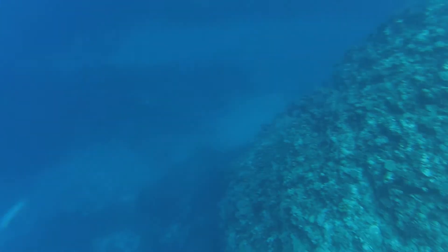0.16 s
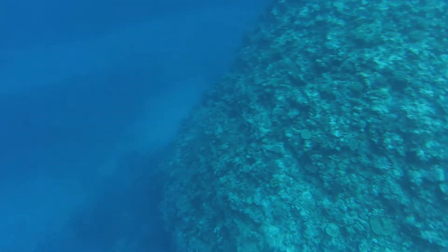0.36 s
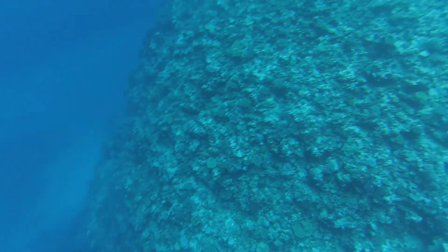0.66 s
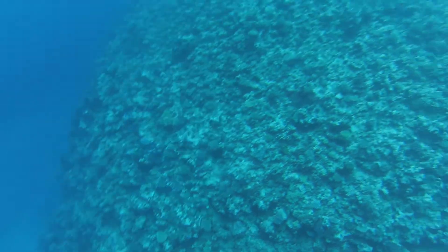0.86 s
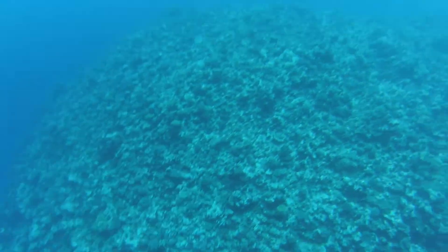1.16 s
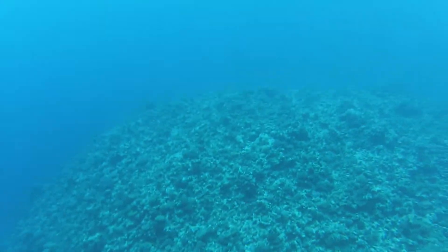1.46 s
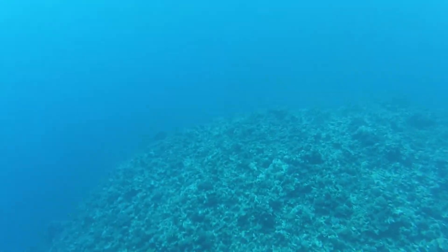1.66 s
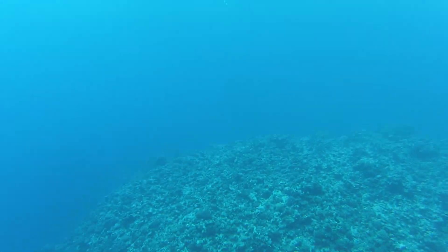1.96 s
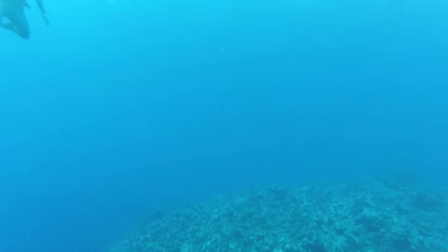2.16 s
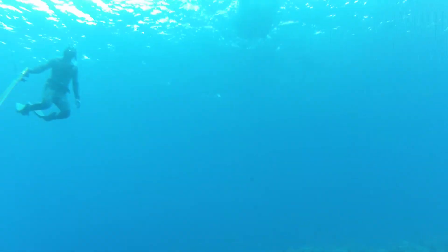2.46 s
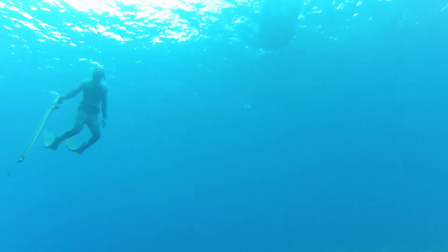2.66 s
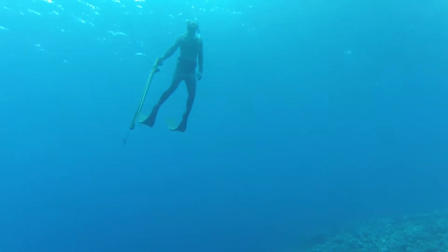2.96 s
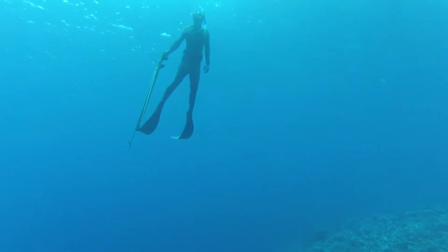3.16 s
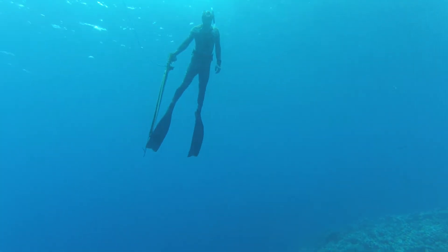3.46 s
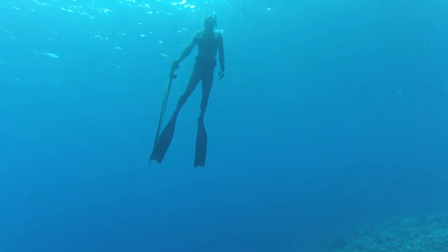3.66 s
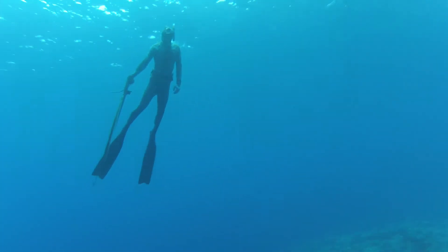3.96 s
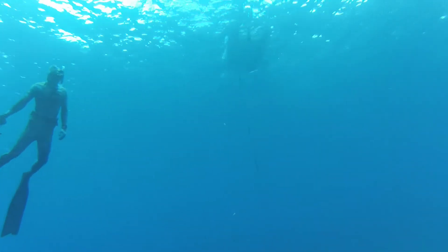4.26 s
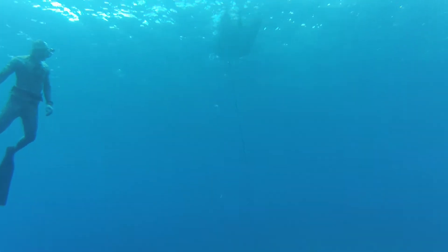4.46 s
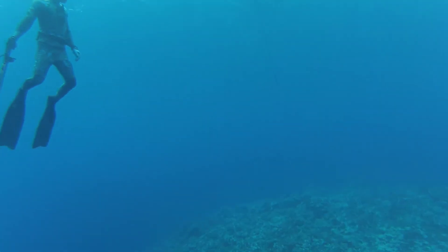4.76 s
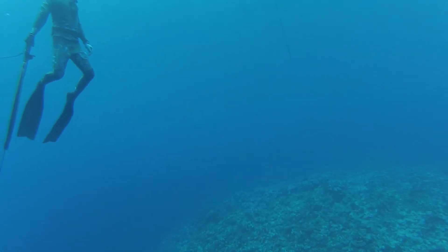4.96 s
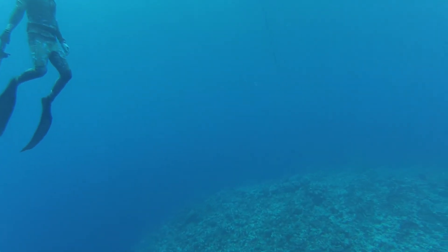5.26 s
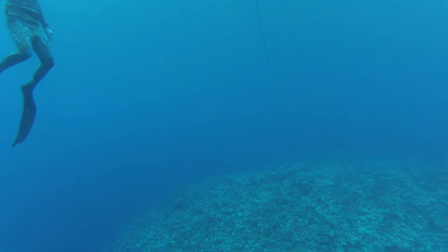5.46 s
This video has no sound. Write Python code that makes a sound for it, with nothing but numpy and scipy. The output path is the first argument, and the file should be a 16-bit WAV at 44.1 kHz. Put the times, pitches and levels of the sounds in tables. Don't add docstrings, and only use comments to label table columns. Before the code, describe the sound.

Bubbles snap against a camera housing turning underwater above a reef. Sparse bright plinks open, a dense gurgling and fizzing burst follows, then an even string of leaking bubbles hums downward amid stuttering creaks. The second half is calmer: deep streaming water, dull thuds, scattered pops, three quick hard knocks and one harder bump. The microphone is inside the case, muffled and resonant, with no open-air echo.

```python
import sys
import numpy as np
from scipy import signal
from scipy.io import wavfile
from scipy.ndimage import uniform_filter1d

SR = 44100
rng = np.random.default_rng(int(sys.argv[2]) if len(sys.argv) > 2 else 0)


def gain_from_db(level_db):
    decades = np.asarray(level_db, float) / 20
    return 10 ** decades


def wav_out(sig):
    wavfile.write(sys.argv[1], SR, np.round(np.clip(np.atleast_2d(sig).T, -1, 1) * 32767).astype(np.int16))


N = 246959
t = np.arange(N) / SR


def evened(x):
    return x / np.sqrt(np.mean(x ** 2) + 1e-20)


def read(points, hz):
    f, value = np.transpose(points)
    return np.interp(np.log(hz + 1), np.log(f + 1), value)


def add(mix, s, sound):
    part = mix[max(round(s * SR), 0):][:len(sound)]
    part += sound[:len(part)]


def ring(hz, cycles, glide=0., rise=0.29):
    u = np.arange(int(cycles * SR / hz) + 8) * hz / SR
    tone = np.sin(2 * np.pi * (u + glide * u ** 2 / cycles))
    return tone * gain_from_db(-60 * u / cycles) * (1 - np.exp(-u / rise)) ** 2


def struck(modes, bright_db=0., chance=np.zeros((2, 5))):
    out = np.zeros(3000)
    for (hz, cycles, db), detune, shift in zip(modes, *chance):
        level_db = db + bright_db * (hz > 2900) + 3.0 * shift
        add(out, 0, gain_from_db(level_db) * ring(hz * (1 + .03 * detune), cycles, rise=hz / 2600))
    return out


def snap(points):
    level_db = read(points, abs(np.fft.fftfreq(4096, 1 / SR)))
    log_gain = np.log(gain_from_db(np.maximum(level_db, -100)))
    pulse = np.fft.ifft(np.exp(np.conj(signal.hilbert(log_gain)))).real[:1024]
    return pulse / abs(pulse).max()


def noise(points, size, patchy_db, flicker_db):
    frames, hz = 4 * N // size + 5, np.fft.rfftfreq(size, 1 / SR)
    a, b, patches = rng.standard_normal((frames, len(hz), 3)).T
    patches = evened(uniform_filter1d(uniform_filter1d(patches, size=6, axis=0), size=6, axis=1))
    flicker = evened(uniform_filter1d(rng.standard_normal(frames), size=3))
    level_db = read(points, hz)[:, None] + patchy_db * patches + flicker_db * flicker
    z = (a + 1j * b) * gain_from_db(level_db)
    return evened(signal.istft(z, nperseg=size, noverlap=size - size // 4)[1][:N])


# (pitch [Hz], rms level [dB])
WHINE_TONES = [(11075, -88), (12557, -90), (13067, -76), (13127, -79)]


def whine():
    tones = [np.sqrt(2) * gain_from_db(db) * np.sin(2 * np.pi * (hz * t + rng.random())) for hz, db in WHINE_TONES]
    return sum(tones)


# (pitch [Hz], level per Hz [dB])
HISS_SPECTRUM = [(150, -71), (250, -48), (554, -7.5), (883, 6), (1230, -35), (1640, -0.5), (1860, -47),
                 (2360, 8), (2910, -23), (3970, -1), (5330, -17.5), (6120, -7), (8800, -17), (10400, -9.5),
                 (12500, -16.5), (15150, -20), (15500, -52)]


def hiss():
    return gain_from_db(-58.5) * noise(HISS_SPECTRUM, size=256, patchy_db=2.8, flicker_db=2.4)


# (time [s], amount [dB], coarseness: large bubbles over small [dB])
SHED_AIR = [(0, -63.5, -15), (.88, -54.5, -1), (.97, -48.5, -17), (1.11, -43.5, -26.5), (1.57, -41.5, -6),
            (1.65, -36, -11), (1.89, -42, -1), (2.56, -41, -5), (2.74, -51, 4), (3.15, -47.5, 1.5),
            (3.4, -55, 11.5), (4.62, -53, 7.5), (5.6, -56.5, 7)]


def flow(amount=1.0, coarse=0.):
    s, amount_db, coarse_db = np.transpose(SHED_AIR)
    return gain_from_db(np.interp(t, s, amount * amount_db + coarse * coarse_db))


# (pitch [Hz], level per Hz [dB])
RUMBLE_SPECTRUM = [(7.1, -5), (12, 21.5), (30, 0), (120, -12), (173, -14), (254, -27.5), (316, -34),
                   (400, -29.5), (520, -45.5), (880, -120)]
# (time [s], level [dB])
STREAMING_WATER = [
    (0.0, -47.5),
    (1.25, -40.5),
    (1.54, -42),
    (2.14, -37.5),
    (2.37, -38),
    (2.71, -36),
    (2.92, -41),
    (4.16, -38.5),
    (4.35, -36.5),
    (5.6, -42),
]


def rumble():
    low = noise(RUMBLE_SPECTRUM, size=2048, patchy_db=-1.3, flicker_db=3.0)
    deep = signal.filtfilt(*signal.butter(2, 48.6, fs=SR), low)
    s, db = np.transpose(STREAMING_WATER)
    sway = gain_from_db(-8.5) * flow(0.047, -.22) * deep
    drone = gain_from_db(np.interp(t, s, db) + 41.5) * (low - deep)
    return gain_from_db(-31) * (sway + drone)


# (time [s], level [dB], ring pitch [Hz], bare click level [dB])
TICK_TIMES = [(0.176, -50, 10000, -48), (0.3031, -40, 10900, -44), (0.5105, -51, 11300, -46),
              (0.564, -30, 11400, -41), (0.9267, -49, 9390, -49), (0.9706, -39, 11600, -44),
              (0.9945, -37, 12600, -46), (1.0539, -38, 12400, -46), (1.0918, -42, 9300, -46),
              (1.1133, -34, 11400, -46), (1.1704, -42, 10500, -46), (1.222, -44, 12400, -46),
              (1.3636, -32, 11800, -48), (1.4036, -46, 10200, -52), (1.452, -45, 12000, -46),
              (1.4979, -37, 12600, -48), (1.6225, -41, 10500, -41), (1.733, -50, 11200, -44),
              (1.7458, -47, 11100, -46), (1.768, -32, 11800, -46), (1.928, -41, 10400, -49),
              (2.0606, -43, 12000, -46), (2.1675, -50, 9950, -46), (2.327, -41, 10400, -46),
              (2.6125, -54, 11300, -44), (2.7556, -50, 10000, -46), (2.841, -47, 10500, -46),
              (3.19, -44, 10100, -46), (3.2972, -49, 10200, -46), (3.6141, -40, 11900, -46),
              (3.7682, -51, 10500, -42), (3.8486, -45, 12000, -46), (4.6694, -60, 11000, -41),
              (4.9949, -44, 9650, -44), (5.0667, -50, 10100, -43), (5.1172, -50, 9750, -38),
              (5.1235, -42, 10400, -37), (5.2938, -50, 10300, -45)]


def ticks():
    out = np.zeros(N)
    for s, db, hz, click_db in TICK_TIMES:
        add(out, s, gain_from_db(db + 1.5) * ring(hz, 60.0, rise=0.32))
        add(out, s, gain_from_db(click_db + 14.0) * ring(9100, 3.5))
    return out


# (time [s], level [dB], ring pitch [Hz], thud level [dB])
SOFT_KNOCKS = [(1.095, -34, 770, -33), (1.193, -32, 630, -62), (1.787, -38.5, 786, -35),
               (2.045, -39, 910, -41), (2.166, -37, 710, -40), (2.218, -41.5, 457, -33),
               (4.206, -43, 677, -53), (3.115, -45, 720, -59), (3.17, -35.5, 720, -47),
               (3.282, -36.5, 640, -45), (3.402, -41, 705, -46), (3.429, -36.5, 620, -44),
               (3.508, -34.5, 670, -45), (3.646, -41, 645, -36), (3.832, -37.5, 660, -45),
               (3.924, -38, 670, -53), (4.134, -38, 620, -34.5), (4.514, -41, 664, -33),
               (4.163, -40.5, 695, -31), (4.774, -37.5, 606, -48), (4.85, -40, 685, -40),
               (4.991, -29.5, 647, -41), (5.494, -42.5, 696, -51), (4.098, -39, 680, -37)]
# (time [s], level [dB])
HARD_BUMPS = [
    (4.6393, -22),
    (4.669, -20),
    (4.696, -20.5),
    (4.9679, -16),
]
# (pitch [Hz], fade [cycles], level [dB])
BUMPED_CASE = [
    (1286, 6.3, 13.5),
    (2100, 8, -25),
    (760, 10.1, 6.5),
    (177.4, 10.4, 0),
]


def knocks():
    out = np.zeros(N)
    for s, db, hz, thud_db in SOFT_KNOCKS:
        add(out, s, gain_from_db(db + 9.5) * ring(hz, 23.0))
        add(out, s, gain_from_db(db + 5.5) * ring(439, 13.5))
        add(out, s, -gain_from_db(thud_db + 9.0) * ring(173, 8.8))
    for s, db in HARD_BUMPS:
        add(out, s, -gain_from_db(db) * struck(BUMPED_CASE))
    return out


# (start [s], end [s], slip rate [1/s], level [dB], brightness [dB])
MOUNT_CREAKS = [(1.726, 1.765, 230, -25.5, -11.5), (2.375, 2.414, 173, -34, -1),
                (2.44, 2.485, 152, -25, -11), (2.541, 2.581, 123, -24.5, -6),
                (2.59, 2.627, 190, -28.5, -10), (2.676, 2.73, 119, -28, 2.5),
                (2.877, 2.978, 141, -31.5, 1.5), (3.003, 3.035, 107, -29, 1.5),
                (3.171, 3.189, 163, -26, -11), (3.205, 3.242, 152, -23.5, -0.5),
                (3.285, 3.307, 123, -30, -9), (3.426, 3.454, 170, -27, -12.5),
                (3.501, 3.52, 320, -32, -4.5), (3.6, 3.623, 173, -26, -15), (4.774, 4.802, 96, -31.5, -6.5),
                (4.733, 4.747, 62, -37, 5.5), (4.831, 4.845, 110, -44.5, 10)]
# (pitch [Hz], fade [cycles], level [dB])
SLIPPING_MOUNT = [
    (4150, 30, 3),
    (3500, 32, 1),
    (2350, 20, -8),
    (1700, 18, 0),
    (780, 10, -3),
]


def creaks():
    out = np.zeros(N)
    chances = rng.standard_normal((len(MOUNT_CREAKS), 24, 3, 5))
    for (start, end, per_s, db, bright_db), chance in zip(MOUNT_CREAKS, chances):
        uneven = max(0.00319 * (per_s - 125), .07)
        gaps = np.maximum(1 + uneven * chance[:, 2, 0], .3) / per_s
        times = start + np.cumsum(gaps) - gaps[0]
        vary = min(3 * uneven + .5, 1)
        for s, slip in zip(times[times < end], chance):
            add(out, s, gain_from_db(db + 2.5 * slip[2, 1]) * struck(SLIPPING_MOUNT, bright_db, vary * slip[:2]))
    return out


# (time [s], bubble rate [1/s], level [dB])
LEAKING_SEAM = [
    (2.12, 84, -55),
    (2.3, 78.9, -33.5),
    (2.544, 73.4, -30.5),
    (2.774, 69.0, -29),
    (2.962, 65.7, -31),
    (3.1, 62.5, -38),
    (3.2, 60.5, -58),
]
# (pitch [Hz], fade [cycles], level [dB])
LEAKED_BUBBLE = [
    (790, 12, 0),
    (1030, 15, -5),
    (2300, 22, 1),
]


def leak():
    s, per_s, db = np.transpose(LEAKING_SEAM)
    turns = np.cumsum(np.interp(t, s, per_s, 0, 0)) / SR + .35
    strength = gain_from_db(np.interp(t, s, db) + 0.31 * rng.standard_normal(N))
    births = np.diff(np.floor(turns), prepend=0) * strength
    return signal.oaconvolve(births, struck(LEAKED_BUBBLE))[:N]


# (pitch [Hz], level [dB])
CASE_WALL = [(150, -22), (250, -15), (442, -5.5), (508, -4.5), (796, 5), (1090, -6.5), (1640, 5.5),
             (2410, 8.5), (2960, -2.5), (3520, 1.5), (5420, -25), (6120, -15), (8060, -32), (12000, -23),
             (15600, -67)]


def swarm(clumps, low_hz, high_hz, cycles, per_s, spread_db, count=14):
    out = np.zeros(N)
    for hz, (life, glide) in zip(np.geomspace(low_hz, high_hz, count), rng.random((count, 2))):
        luck = rng.random(N) * count * SR / per_s
        size = (luck < 1) * gain_from_db(spread_db * np.minimum(-np.log(luck + 1e-9), 2.5))
        bubble = ring(hz, cycles * (1.06 + life), 0.32 * (glide - .3))
        out += gain_from_db(read(CASE_WALL, hz)) * signal.oaconvolve(size * clumps, bubble)[:N]
    return evened(out)


def trickling():
    clumps = gain_from_db(3.8 * evened(uniform_filter1d(rng.standard_normal(N), size=700)))
    fine = gain_from_db(-17) * flow(coarse=-0.75) + gain_from_db(-70)
    gurgle = gain_from_db(-2.0) * flow(coarse=0.84) * swarm(clumps, 264.0, 1040, 18.0, 900, 3.1)
    trickle = gain_from_db(-1.5) * flow() * swarm(clumps, 1107, 2748, 36.0, 520, 6.0)
    fizz = gain_from_db(-1.0) * fine * swarm(clumps, 3043, 4530, 46.0, 400, 6.5)
    crackle = gain_from_db(-14) * fine * swarm(clumps, 5350, 15000, 30.0, 300, 3.0, count=10)
    strength = gain_from_db(3.5 * np.minimum(rng.exponential(1, N), 3))
    snaps = (rng.random(N) < 300 / SR) * strength * clumps
    burst = gain_from_db(-9.5) * flow(coarse=-.25) * evened(signal.oaconvolve(snaps, snap(CASE_WALL))[:N])
    return gurgle + trickle + fizz + crackle + burst


def pops(rows, cycles, apart, neighbour_db, snap_db, crunch_db):
    out, wall = np.zeros(N), snap(CASE_WALL)
    flutter = evened(uniform_filter1d(uniform_filter1d(rng.standard_normal(N), size=30), size=30))
    crunch_s, crunch_rise_s = .022, .0008
    fade = gain_from_db(-60 * t[:900] / crunch_s) * np.minimum(t[:900] / crunch_rise_s, 1)
    grit = rng.standard_normal((len(rows), 900)) * fade
    grit = signal.oaconvolve(grit, wall[None] / np.linalg.norm(wall), axes=1)
    chances = rng.uniform(-1.26, 1, (len(rows), 4))
    for (s, db, hz), chance, crunch in zip(rows, chances, grit):
        add(out, s, gain_from_db(db + snap_db) * wall + gain_from_db(db + crunch_db) * crunch[:len(wall)])
        life, glide = cycles * (1 + 0.25 * chance[0]), 0.093 * (chance[1] + 0.35)
        add(out, s, gain_from_db(db + 4.0) * ring(hz, life, glide, rise=cycles / 40))
        higher_hz = hz * (1 + apart * (1 + .5 * chance[2]))
        lower_hz = hz * (1 - apart * (1 + .5 * chance[3]))
        add(out, s, gain_from_db(db + neighbour_db) * ring(higher_hz, 1.02 * cycles, rise=0.18))
        add(out, s, gain_from_db(db + neighbour_db - 5.5) * ring(lower_hz, 0.79 * cycles, rise=0.55))
    return out * (.9 + .4 * flutter)


# (start [s], length [s], level [dB], ring pitch [Hz])
BUBBLE_STRINGS = [(0.9487, .012, -28, 2470), (1.033, .004, -25, 2070), (1.187, .03, -28.5, 2190),
                  (1.284, .026, -29.5, 2500), (1.576, .016, -27, 1505), (1.722, .004, -26, 1900),
                  (1.7466, .012, -20, 1744), (1.95, .014, -26.5, 1376), (2.117, .015, -22.5, 1465),
                  (2.168, .004, -22, 2100), (2.1932, .028, -23.5, 1805), (2.343, .004, -25, 2010),
                  (2.654, .022, -32, 1680), (4.095, .05, -39.5, 1426)]


def strung():
    rows = []
    chances = rng.standard_normal((len(BUBBLE_STRINGS), 8, 3))
    for (start, length, db, hz), chance in zip(BUBBLE_STRINGS, chances):
        gaps = 0.0096 * (1 + 0.19 * chance[:, 0])
        late = np.cumsum(gaps) - gaps[0]
        for s, c in zip(late, chance):
            if s < length:
                rows.append((start + s, db + c[1], hz * (1 + 0.05 * c[2]), db - 8))
    return rows


# (time [s], level [dB], ring pitch [Hz], wall level [dB])
CALM_POPS = [(0.0587, -19, 1960, -29.5), (0.0595, -20.5, 2500, -45), (0.0779, -20.5, 2560, -54),
             (0.0853, -29.5, 1920, -22), (0.2092, -35, 2790, -57), (0.303, -29, 2510, -22.5),
             (0.3099, -21, 2530, -45), (0.3168, -26, 2700, -43), (0.3292, -33, 2780, -29),
             (0.338, -42, 1930, -29.5), (0.4268, -43, 2700, -60), (0.4319, -34.5, 2640, -60),
             (0.5097, -25, 2440, -31.5), (3.504, -33.5, 2800, -53), (3.6498, -32, 1350, -55),
             (3.676, -35, 1600, -29), (3.6936, -27.5, 1890, -42), (3.743, -34.5, 2100, -60),
             (3.771, -37, 1620, -55), (3.8307, -35, 1640, -46), (3.9274, -26.5, 1930, -67),
             (4.098, -35.5, 2230, -58), (4.2037, -28.5, 2064, -54), (4.517, -28, 1446, -55),
             (4.9366, -32, 1680, -25), (4.9903, -29, 2500, -32), (4.9967, -24, 1880, -19),
             (5.0122, -27, 1930, -29), (5.0665, -34.5, 2170, -38), (5.238, -36, 1590, -62),
             (5.308, -34.5, 1610, -66), (5.448, -35, 2300, -40)]
# (time [s], level [dB], ring pitch [Hz], wall level [dB])
STREAM_POPS = [(0.9294, -27, 2050, -32), (0.963, -24, 2360, -28), (1.016, -27, 2870, -26),
               (1.0405, -18, 2070, -43), (1.0439, -19, 1930, -37), (1.0602, -26, 2200, -20),
               (1.2092, -22.5, 1730, -27), (1.2794, -29, 2160, -49), (1.4041, -25.5, 2790, -40),
               (1.4745, -20.5, 2400, -21), (1.506, -28.5, 2100, -45), (1.536, -30.5, 2450, -31),
               (1.5985, -24.5, 1470, -30), (1.6215, -27, 1660, -26.5), (1.733, -25, 1970, -33),
               (1.767, -18, 1360, -22), (1.8007, -21, 2190, -54), (1.8161, -25, 1640, -53),
               (1.8402, -17.5, 1600, -48), (1.866, -23.5, 1700, -55), (1.907, -24, 2250, -60),
               (1.934, -27, 1400, -52), (2.0443, -19.5, 1332, -32), (2.1058, -21, 1550, -28),
               (2.1247, -23, 1490, -35), (2.1465, -26, 1630, -45), (2.1816, -20, 1860, -27),
               (2.2448, -22.5, 1710, -45), (2.2985, -24, 1700, -37), (2.355, -20.5, 2240, -34)]
# (time [s], level [dB], ring pitch [Hz])
FAINT_LARGE_POPS = [(0.2744, -49, 2470), (0.4379, -38, 2630), (1.0092, -28, 2650), (1.1655, -45, 2060),
                    (1.2639, -35, 2240), (1.3647, -35, 2460), (1.431, -29, 2470), (1.496, -40, 2020),
                    (1.5822, -29, 1460), (1.6071, -27, 2250), (1.672, -43, 1800), (1.6895, -27, 1330),
                    (1.929, -25.5, 1430), (1.9874, -32, 1340), (2.065, -33, 1380), (2.3355, -30, 2430),
                    (2.3874, -26, 2040), (2.4098, -26.5, 1710), (2.5142, -35, 1850), (2.6265, -28, 1790),
                    (2.8398, -43, 2240), (2.9474, -35, 1720), (4.1766, -39.5, 2460), (4.4072, -45, 2330)]
# (time [s], level [dB], ring pitch [Hz])
SMALL_POPS = [(0.0935, -31, 4480), (0.176, -33, 3430), (0.2958, -31.5, 3300), (0.318, -29, 4720),
              (0.5658, -30, 4760), (.9946, -32, 3970), (1.1767, -25, 3430), (1.2637, -29.5, 3300),
              (1.331, -27.5, 4470), (1.3636, -21, 3450), (1.4527, -30, 3220), (1.6416, -25.5, 3770),
              (1.672, -26.5, 3340), (1.751, -22, 3760), (1.9465, -27, 3160), (1.9889, -33, 3840),
              (2.1686, -23.5, 3335), (2.3876, -27.5, 3280), (2.4406, -21, 3490), (2.6168, -23, 3490),
              (2.6536, -22.5, 3520), (2.6705, -22, 3860), (2.8408, -34.5, 3960), (3.118, -29, 3680),
              (3.1703, -27, 3400), (3.2837, -27.5, 3300), (3.4275, -27, 3370), (3.599, -19.5, 3410),
              (4.85, -30, 3600), (4.8606, -31.5, 3170),
              (0.2723, -44, 3380), (0.3554, -43, 3150), (0.9744, -36, 3860), (1.0469, -26, 3530),
                    (1.1149, -25, 3900), (1.1343, -35, 3500), (1.1701, -27, 3480), (1.2406, -28.5, 3360),
                    (1.3063, -35, 3130), (1.4021, -29, 3700), (1.4306, -30, 3300), (1.4894, -28, 3350),
                    (1.5243, -37, 3490), (1.5368, -19.5, 3880), (1.5712, -28.5, 3440), (1.661, -33, 3630),
                    (1.7035, -30, 3350), (1.7373, -24, 3300), (1.7923, -52, 3400), (1.8397, -42, 3600),
                    (1.9419, -31, 3350), (1.9614, -34, 3600), (2.0287, -51, 3710), (2.0426, -25, 4090),
                    (2.0606, -31, 3300), (2.086, -33, 3460), (2.1014, -28.5, 3750), (2.1225, -27, 3780),
                    (2.2073, -25, 4210), (2.2463, -32, 3900), (2.2961, -28.5, 4100), (2.3451, -26, 3340),
                    (2.4064, -29, 3640), (2.5136, -32, 3270), (2.5285, -22, 3680), (2.6269, -25, 3480),
                    (2.7364, -34, 3770), (3.0613, -37, 4020), (3.6674, -32, 3760), (3.8317, -38, 3750),
                    (4.786, -35, 3320)]
# (time [s], level [dB], ring pitch [Hz])
TINY_POPS = [(.0584, -34, 5200), (.2089, -44, 6100), (.5104, -41.5, 7050), (.9302, -27.5, 6960),
             (.952, -35.5, 5900), (.9629, -34.5, 7260), (1.032, -31, 6300), (1.0497, -30, 6600),
             (1.1879, -37, 7100), (1.2309, -33, 5940), (1.2639, -32.5, 6900), (1.3064, -40, 6700),
             (1.403, -23.5, 5900), (1.4807, -33, 6200), (1.7277, -36, 6060), (2.1337, -34, 5950),
             (2.1676, -32.5, 6450), (2.841, -33.5, 6670), (3.131, -33.5, 5030), (3.1899, -37, 6500),
             (0.194, -52, 6050), (0.289, -42, 7210), (1.0076, -45, 6430), (1.0764, -35, 5700),
                   (1.105, -35, 5950), (1.1338, -50, 6450), (1.156, -47, 6040), (1.2524, -38, 6520),
                   (1.2794, -44, 6030), (1.2915, -41, 6400), (1.32, -49, 6580), (1.3567, -42, 6660),
                   (1.452, -37, 6500), (1.5363, -47, 5360), (1.5716, -41, 6300), (1.9535, -46, 6900),
                   (1.9734, -43, 7040), (2.0938, -45, 6060), (2.1464, -41, 6400), (2.1954, -43, 5800),
                   (2.3436, -53, 5890), (2.4048, -57, 5500), (2.4683, -50, 7800), (2.6693, -41, 6270),
                   (2.7354, -40.5, 6150), (2.8813, -43, 6740), (3.0953, -44, 6430), (3.3976, -44, 6100),
                   (3.4342, -43.5, 6800), (3.5682, -43, 6050), (3.768, -46, 6170), (4.1962, -41, 6800),
                   (4.2544, -41.5, 6220), (4.774, -46, 5980), (4.8406, -40, 6970), (4.9959, -40, 5760),
                   (5.012, -40, 5500), (5.1166, -43, 7010)]


def popping():
    big = np.array(CALM_POPS + STREAM_POPS + strung())
    wall_hz = 3480 * (1 + 0.025 * rng.standard_normal(len(big)))
    wall = np.column_stack([big[:, [0, 3]], wall_hz])
    large = pops(list(big[:, :3]) + FAINT_LARGE_POPS, 42.0, 0.17, -3.5, -11.0, -12.0)
    small = pops(list(wall) + SMALL_POPS, 62.0, 0.164, -8.5, -7.5, -16.5)
    tiny = pops(TINY_POPS, 73.0, 0.13, -5.0, -30.0, -14.0)
    return large + small + tiny


def scene():
    background = whine() + hiss() + rumble()
    case = ticks() + knocks() + creaks()
    bubbles = leak() + trickling() + popping()
    return (background + case + bubbles)[None]


def band_limit(x):
    return signal.sosfilt(signal.butter(12, 15500, fs=SR, output="sos"), x)


def record(dry):
    ceiling = .3
    mix = ceiling * np.tanh(dry / ceiling)
    return band_limit(mix)


dry = scene()
out = record(dry)
wav_out(out)
```